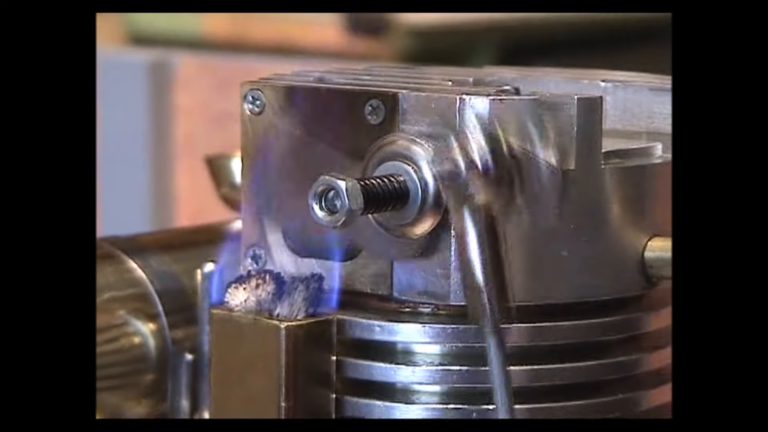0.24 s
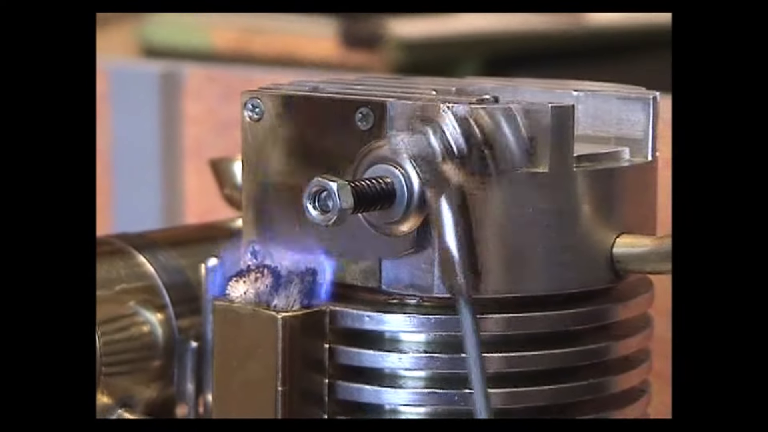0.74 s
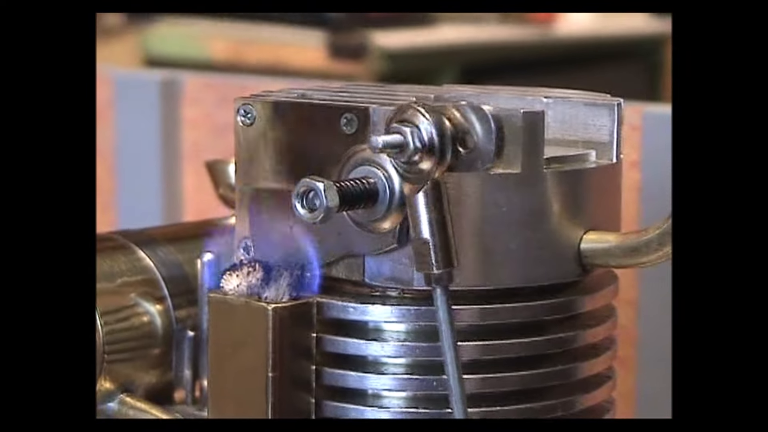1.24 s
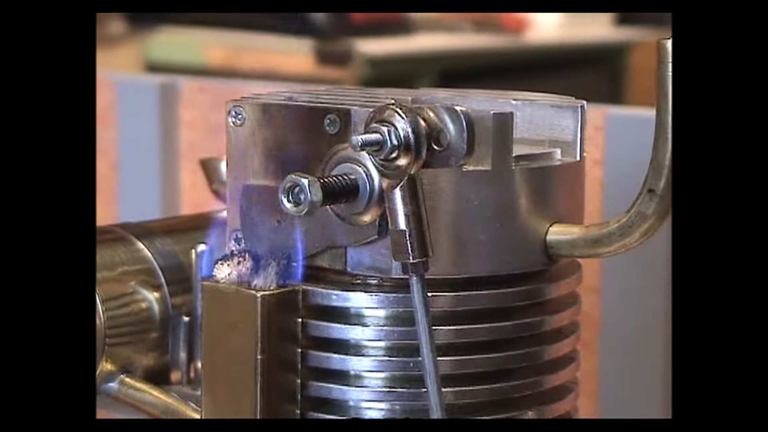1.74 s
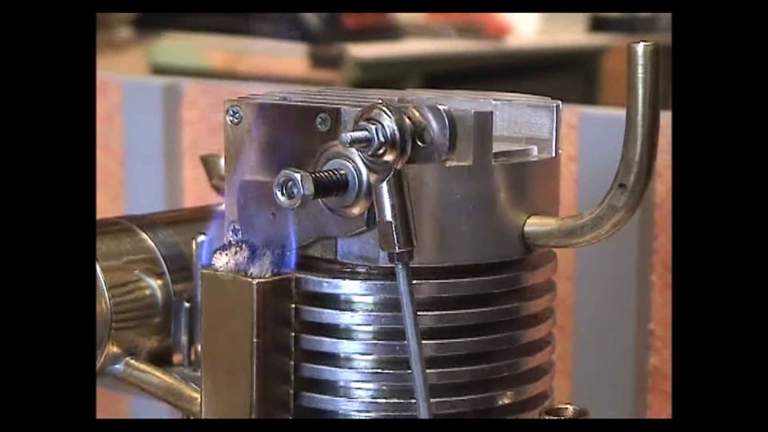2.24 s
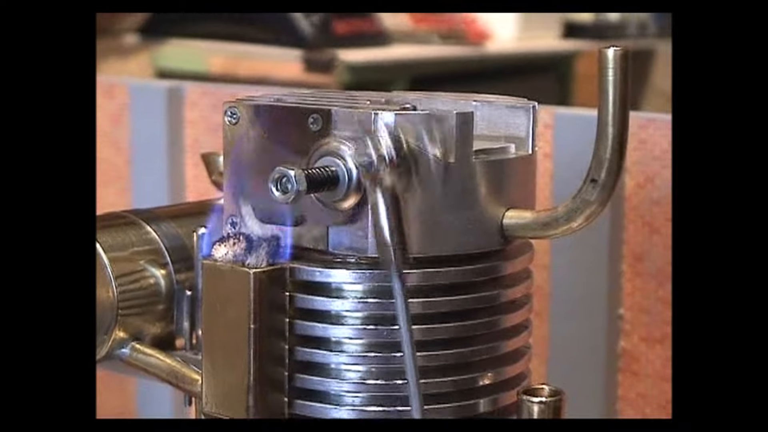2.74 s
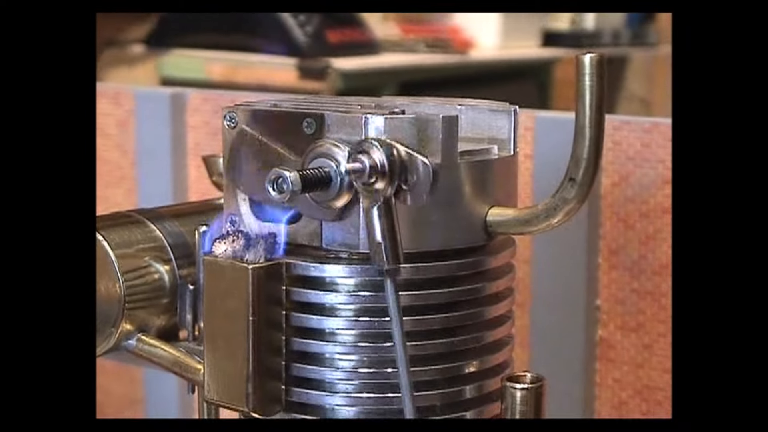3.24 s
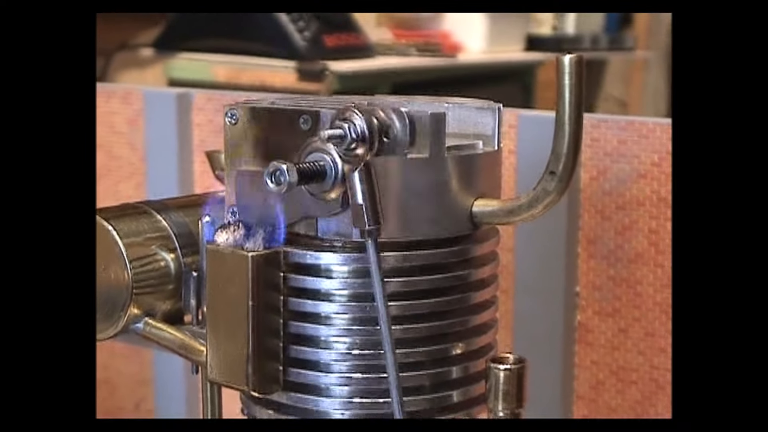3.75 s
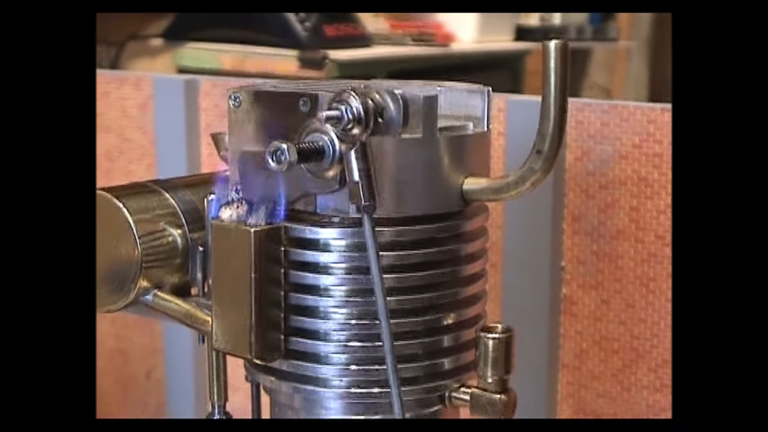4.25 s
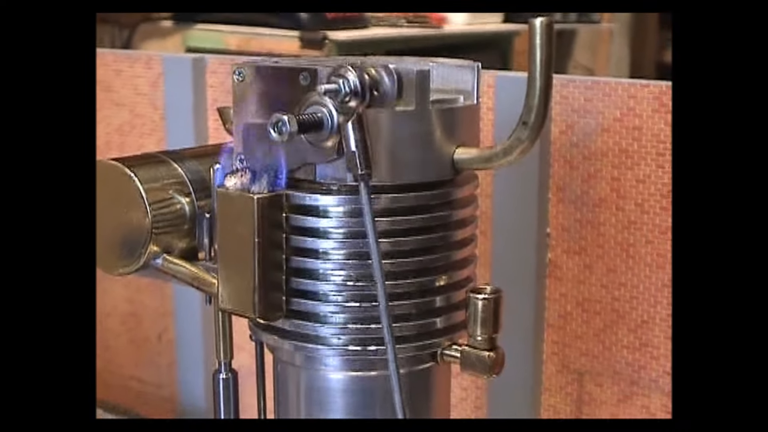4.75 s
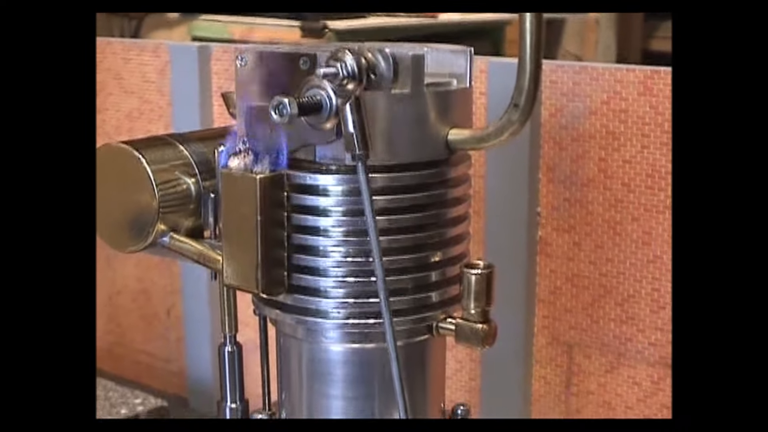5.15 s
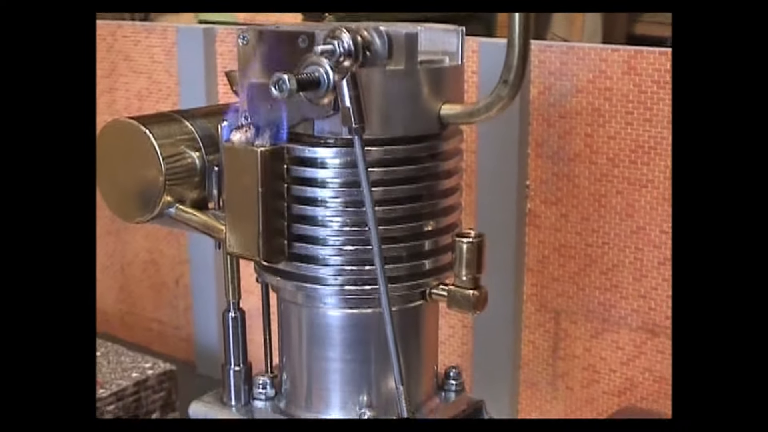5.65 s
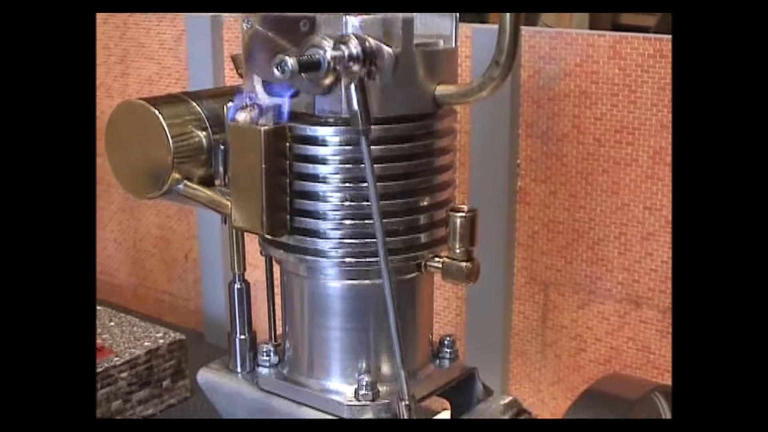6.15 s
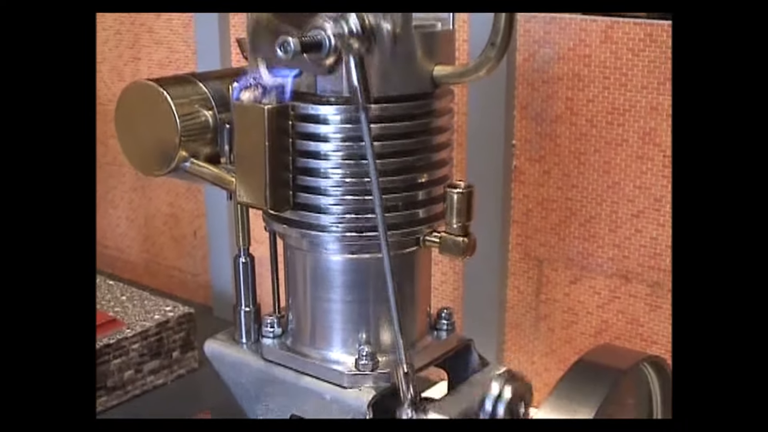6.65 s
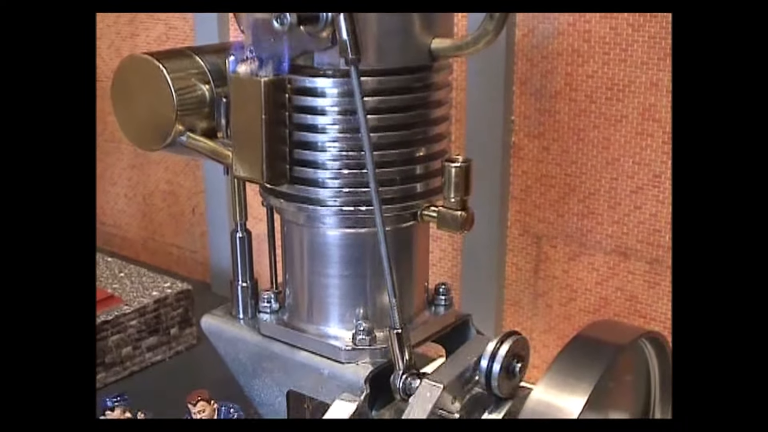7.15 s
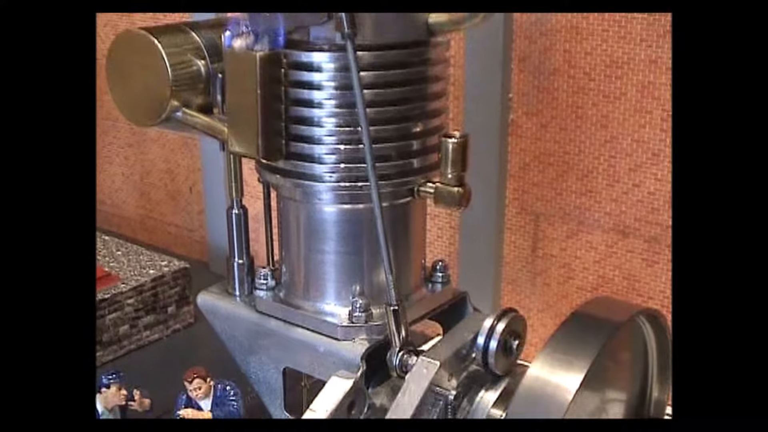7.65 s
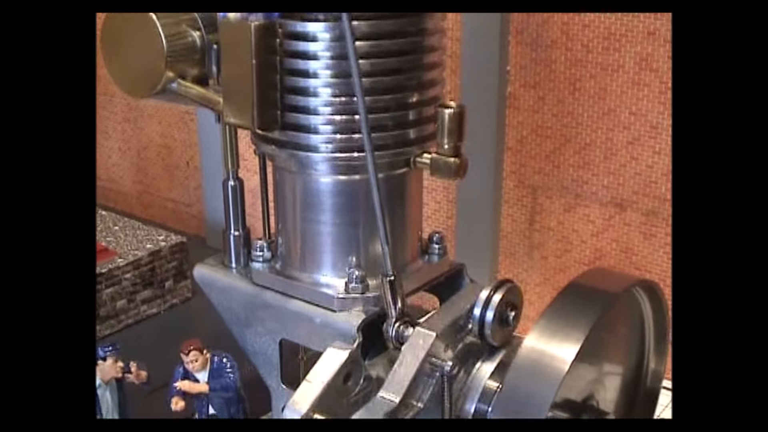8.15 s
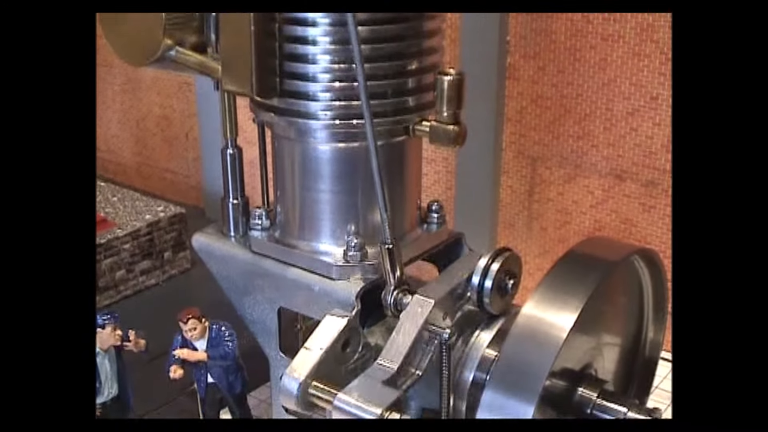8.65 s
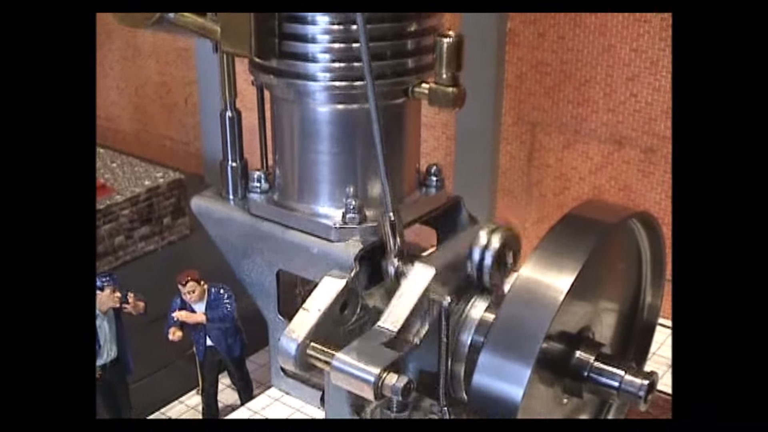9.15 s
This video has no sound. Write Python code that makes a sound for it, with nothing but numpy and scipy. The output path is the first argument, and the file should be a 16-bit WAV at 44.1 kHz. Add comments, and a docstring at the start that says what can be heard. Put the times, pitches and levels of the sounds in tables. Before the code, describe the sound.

Close stereo pickup of a little flame-driven engine, already running and never stopping. Crisp snaps and lower frame knocks alternate evenly, roughly nine main beats a second, with small ticks and rattling between them. Friction swishes with every turn and the cylinder air hums faintly in the middle range. Soft steady room noise and a short, light indoor echo surround it, with little deep bass.

```python
"""A small flame-fed model engine runs at about four and a half turns a second on a bench in a quiet workshop.
Soft room noise and the rubbing of sliding parts sound throughout; the cylinder air hums under them.
Once a turn faint ticks lead to the valve snap, with its puff and rebound; half a turn later the crank knocks
the frame, the valve gear ticks, the cylinder hoots and the gear rattles. From 1.88 s a loose part taps at times.
Contacts are noise bursts and decaying modes, rubbing is noise through those modes; the shop echoes it all."""
import sys
import numpy as np
from scipy import signal
from scipy.fft import rfft, irfft, next_fast_len
from scipy.io import wavfile

SR = 44100
rng = np.random.default_rng(int(sys.argv[2]) if len(sys.argv) > 2 else 0)


def convert_level_to_amplitude(level_db):
    """Map a level in decibels to its linear amplitude factor."""
    exponent = np.asarray(level_db, float) / 20
    return 10 ** exponent


def master_out(mix):
    """Clip the mix to full scale and print it as 16-bit PCM to the path in sys.argv[1]."""
    frames = np.transpose(np.atleast_2d(mix))
    ceiling = np.clip(frames, -1, 1)
    pcm = np.round(ceiling * 32767).astype(np.int16)
    wavfile.write(sys.argv[1], SR, pcm)


N = 414981


def rms_one(x):
    """Scale to rms 1."""
    return x / np.sqrt(np.mean(x ** 2) + 1e-20)


def at_hz(points, hz):
    """Interpolate (hz, value) points on a log-frequency axis."""
    points_hz, values = np.transpose(points)
    return np.interp(np.log(hz), np.log(points_hz), values)


def drift(rate_hz):
    """Slow random wander of rms 1: noise through two equal poles at rate_hz, computed every 40 samples."""
    hop = 40
    r = np.exp(-2 * np.pi * rate_hz * hop / SR)
    slow = signal.lfilter([1], [1, -2 * r, r * r], rng.standard_normal(N // hop + 2002))[2000:]
    return np.interp(np.arange(N) / hop, np.arange(len(slow)), rms_one(slow))


# stereo lean of radiated modes: pitch_hz, left_minus_right_db
LEAN = [(250, 1.27), (800, -1.71), (1180, 5.5), (2000, -1)]


def ring(push, hz, t60_s):
    """Two-pole resonator: a unit click rings a decaying sine of height 1, leaning to one side by pitch."""
    r, w = convert_level_to_amplitude(-60 / (t60_s * SR)), 2 * np.pi * hz / SR
    lean_db = at_hz(LEAN, hz)
    tone = signal.lfilter([0, np.sin(w)], [1, -2 * r * np.cos(w), r * r], push + 1e-18)
    return tone * convert_level_to_amplitude(np.array([[lean_db / 2], [-lean_db / 2]]))


def ring_modes(push, modes):
    """One push rings every (pitch_hz, level_db, t60_s) mode."""
    return sum(convert_level_to_amplitude(db) * ring(push, hz, t60_s) for hz, db, t60_s in modes)


def train(start_s, sizes):
    """Clicks of the given sizes at the given times."""
    out = np.zeros(N)
    at = np.clip(np.asarray(start_s) * SR, 0, N - 1).astype(int)
    np.add.at(out, at.ravel(), np.ravel(sizes))
    return out


def soften(clicks, hz):
    """A soft contact spreads the push in time: two equal low-pass poles."""
    r = np.exp(-2 * np.pi * hz / SR)
    return signal.lfilter([(1 - r) ** 2], [1, -2 * r, r * r], clicks + 1e-18)


def chatter(start_s, level_db, spread_s, count):
    """A loose contact lands as uneven touches, up to 8 dB down; returns times and levels."""
    draw = rng.random((len(start_s), count, 2))
    return start_s[:, None] + spread_s * draw[..., 0], level_db[:, None] - 8 * draw[..., 1]


def strike(modes, start_s, level_db, uneven_db, detune, wide):
    """Each touch rings each mode with its own strength, sign and detuning, a little unlike at the two ears."""
    out, t = np.zeros((2, N + 4000)), np.arange(2000) / SR
    starts = np.clip(np.ravel(start_s) * SR, 0, N).astype(int)
    chance = rng.standard_normal((len(starts), 4, len(modes), 1))
    hz, mode_db, t60_s = np.transpose(modes)[:3, :, None]
    for start, blow_db, (size, sign, tune, lead) in zip(starts, np.ravel(level_db), chance):
        fading_db = blow_db + mode_db + uneven_db * size - 60 * t / t60_s
        fading = np.sign(sign) * convert_level_to_amplitude(fading_db) * np.minimum(t / 0.0001, 1)
        phase = 2 * np.pi * hz * (1 + detune * tune) * t
        skew = wide * lead * hz / 8000      # higher modes radiate less alike to both sides
        ears = [np.sum(fading * np.sin(phase + side * skew), axis=0) for side in (1, -1)]
        out[:, start:start + len(t)] += ears
    return out[:, :N]


def crack(start_s, level_db):
    """Bare noise of metal meeting metal: a short band-limited burst at each hard contact."""
    r = np.exp(-1 / (0.0014 * SR))      # rise and decay time constant 1.4 ms
    clicks = train(start_s, convert_level_to_amplitude(level_db)) + 1e-18
    burst = signal.lfilter([1 - r], [1, -r], signal.lfilter([1], [1, -r], clicks))
    noise = rng.standard_normal(N) + 0.62 * rng.standard_normal((2, N))
    bright = signal.sosfilt(signal.butter(1, 2450, "high", fs=SR, output="sos"), burst * noise)
    return signal.sosfilt(signal.butter(3, 9230, fs=SR, output="sos"), bright)


# workshop noise spectrum, relative: pitch_hz, density_db_per_hz
ROOM = [(30, -67), (130, 13), (340, 7.5), (800, 7), (1500, 2), (2480, -3), (6050, -7), (9970, -20),
        (16000, -36)]
# left-right likeness of the noise: pitch_hz, correlation_ratio
LIKENESS = [(140, 0.89), (380, 0.883), (2380, 0.68), (15000, 0.79)]


def room_noise(patchy_db):
    """Half-octave bands of stereo noise, each with its own level, flicker and left-right likeness."""
    out, edges_hz = 0, 30 * 2 ** np.arange(0, 9.6, .5)
    white = rng.standard_normal((2, 2, N))
    for k, (low, high) in enumerate(zip(edges_hz, edges_hz[1:])):
        band = signal.butter(2, [low, high], "band", fs=SR, output="sos")
        mid, side = signal.sosfilt(band, white[k % 2])
        hz = np.sqrt(low * high)
        alike = np.clip(at_hz(LIKENESS, hz), -1, 1)
        gain = convert_level_to_amplitude(at_hz(ROOM, hz) + patchy_db * drift(8.2))
        out = out + gain * (np.sqrt(1 + alike) * mid + np.sqrt(1 - alike) * side * [[1], [-1]])
    return convert_level_to_amplitude(-49) * rms_one(out)


# crank knocks, nominal: start_s, clank_db, thud_db
KNOCKS = [(0.144, -19.5, -21), (0.3658, -20.5, -24), (0.5845, -22.5, -27), (0.8101, -21, -26),
          (1.0412, -25.5, -22.5), (1.274, -25, -23), (1.5078, -23.5, -21), (1.7392, -24, -22.5),
          (1.9738, -22.5, -24.5), (2.2018, -22, -21), (2.428, -29, -24.5), (2.6596, -22.5, -24),
          (2.8857, -23, -21), (3.1105, -24.5, -21.5), (3.3311, -26, -22.5), (3.5576, -21, -21.5),
          (3.7852, -26, -25.5), (4.011, -21.5, -22), (4.2422, -24.5, -23), (4.4702, -25.5, -25),
          (4.6958, -22.5, -22), (4.9202, -20, -21), (5.1406, -25.5, -23.5), (5.363, -25.5, -23),
          (5.5855, -20, -23), (5.8084, -22.5, -23.5), (6.0321, -22.5, -25), (6.26, -24, -23),
          (6.4845, -28.5, -24), (6.7137, -23, -22), (6.9412, -22, -23), (7.1652, -21.5, -24.5),
          (7.4, -21.5, -23.5), (7.6324, -32.5, -24), (7.8777, -27, -21.5), (8.1212, -24, -25),
          (8.3616, -23, -22.5), (8.598, -22.5, -22), (8.833, -22, -21), (9.0635, -23.5, -21),
          (9.2904, -26.5, -22)]
# rubbing through one turn from the knock, relative: turn_ratio, level_db
RUB = [(0, -43.5), (.1, -35), (.25, -40), (.36, -47), (.42, -39.5), (.6, -49), (.75, -78), (1, -38)]


def rub_strength():
    """Rubbing strength follows the crank angle, with a random flicker."""
    s = np.transpose(KNOCKS)[0]
    knots_s = np.r_[2 * s[0] - s[1], s, 2 * s[-1] - s[-2]]
    turn = np.interp(np.arange(N) / SR, knots_s, np.arange(len(knots_s))) % 1
    return convert_level_to_amplitude(np.interp(turn, *np.transpose(RUB)) + 2.5 * drift(25))


# frame and bench modes: pitch_hz, level_db, t60_s
FRAME = [(249.3, -6, 0.058), (289, -17, 0.16), (341.7, -8.5, 0.079), (440.06, -11.5, 0.082),
         (475.7, -21.5, 0.3), (519, -21, 0.31), (1006.3, -11, 0.062), (1167.7, -4, 0.03),
         (1243, -21, 0.086), (1463, 1.5, 0.016), (1981, -12, 0.03), (2350, -20.5, 0.1), (2975, -10, 0.018),
         (3448, -9.5, 0.018), (4266, -13.5, 0.034), (5190, -22, 0.05), (7100, -15, 0.042),
         (10210, -16, 0.011), (12330, -38, 0.015)]
# thin casing modes: pitch_hz, level_db, t60_s
CASING = [(1500, -88, 0.096), (2048, -88, 0.04)]
# valve plate and lever modes: pitch_hz, level_db, t60_s
VALVE = [(3200, -13, 0.0048), (4760, -9, 0.01694), (5373, -10.5, 0.014), (6134, -2.5, 0.0095),
         (7495, -12, 0.015), (8980, -16, 0.024), (11700, -18, 0.0065), (13800, -28, 0.0067)]


def sliding_parts(stroke):
    """Friction noise drives frame and valve modes with the stroke; the casing sings faintly on its own drift."""
    rub = rng.standard_normal(N)
    frame = convert_level_to_amplitude(-28.5) * ring_modes(rub * stroke, FRAME[:14])
    valve = convert_level_to_amplitude(-37.5) * ring_modes(rub * stroke, VALVE)
    casing = ring_modes(rub * convert_level_to_amplitude(5.1 * drift(9.8)), CASING)
    return frame + valve + casing


# close, beating cylinder air modes: pitch_hz, level_db, t60_s
AIR = [(629.6, -1, 0.099), (684, 1.5, 0.07), (726, -1.5, 0.045)]


def cylinder_air(stroke):
    """Ticks kick neighbouring air modes in opposite sense, so they swell together; flame and rub keep a hum."""
    s = np.transpose(KNOCKS)[0]
    hoot_db = -27.5 + 0.5 * rng.standard_exponential(len(s))
    late = rng.standard_normal((len(s), 2))
    kick = train(s + .0262, convert_level_to_amplitude(hoot_db))
    kick += train(s + 0.042 + 0.00279 * late[:, 0], convert_level_to_amplitude(-34.5 + 6.3 * late[:, 1]))   # the rattle's second kick
    draught = convert_level_to_amplitude(-32.5) * stroke + convert_level_to_amplitude(-73.5)
    out = 0
    for k, (hz, db, t60_s) in enumerate(AIR):
        flame = rng.standard_normal(N)
        out = out + convert_level_to_amplitude(db) * ring((-1) ** k * kick + draught * flame, hz, t60_s)
    return out


# valve closings, nominal: start_s, level_db
SNAPS = [(0.0367, -9), (0.2546, -9.5), (0.4759, -13), (0.6991, -13.5), (0.926, -10), (1.1569, -10),
         (1.39, -10), (1.6218, -13), (1.8535, -9.5), (2.0865, -12.5), (2.3149, -12), (2.542, -10.5),
         (2.772, -10.5), (2.998, -9.5), (3.2206, -11), (3.4464, -14), (3.6708, -10.5), (3.8973, -11),
         (4.1254, -9.5), (4.355, -11), (4.5813, -10.5), (4.8074, -11.5), (5.0305, -10), (5.2513, -11.5),
         (5.4746, -12.5), (5.697, -12.5), (5.92, -11.5), (6.145, -10), (6.372, -16), (6.599, -10.5),
         (6.827, -10), (7.056, -15), (7.2821, -11), (7.517, -12.5), (7.7536, -10), (7.9967, -10),
         (8.2385, -8), (8.4777, -12.5), (8.7133, -13.5), (8.9475, -11.5), (9.177, -11), (9.4037, -11.5)]
# faint ticks before each snap: ahead_s, level_db
LEAD_IN = [(.031, -43), (.019, -41)]
# closings at which the plate lands flat, nominal: start_s, level_db
FLAT_LANDINGS = [(0.037, -16), (3.2224, -17), (3.898, -24), (6.373, -24), (7.057, -21.5), (7.516, -21),
                 (8.479, -23)]


def valve_closing():
    """Lead-in ticks, scuff, snap and rebound ring the valve; seating rings the frame, and the air puffs."""
    shut, snap_db = np.transpose(SNAPS)
    puff_db, rebound_db = np.transpose([-25, -33.5] + [1.1, 4.] * rng.standard_normal((len(shut), 2)))
    ahead_s, lead_db = np.transpose(LEAD_IN)
    slack = rng.standard_normal((len(shut), len(LEAD_IN), 2))
    lead_in = shut[:, None] - ahead_s + 0.00037 * slack[..., 0], lead_db + 4 * slack[..., 1]
    scuff = chatter(shut - .003, snap_db - 19, .005, count=4)
    snap = shut - .0007, snap_db - 7.0
    rebound = chatter(shut + .012, rebound_db, .002, count=1)
    touches = [lead_in, scuff, snap, rebound]
    out = sum(strike(VALVE, *touch, uneven_db=1, detune=0.052, wide=0.37) for touch in touches)
    out += crack(shut - .0012, snap_db - 13.5)
    seating = chatter(shut - .005, puff_db - 12.5, 0.0052, count=3)
    out += strike(FRAME[6:13], *seating, uneven_db=4, detune=.12, wide=.9)
    # the cut-off air stream springs back once
    puff = soften(train(shut - .0042, -convert_level_to_amplitude(puff_db + 3.5)), hz=1233)
    # the plate knocks its seat
    seat_db = puff_db - 8.5 + 3 * rng.standard_normal(len(shut))
    seat = soften(train(shut - .0015, convert_level_to_amplitude(seat_db)), hz=1460)
    landing_s, landing_db = np.transpose(FLAT_LANDINGS)
    landing = soften(train(landing_s + 0.00203, convert_level_to_amplitude(landing_db)), hz=616)
    return out + ring(puff, 197.0, 0.012) + ring(seat, 980, 0.027) + ring(landing, 846, 0.043)


def crank_knock():
    """Hard touches crack and ring high frame modes, a shiver the middle ones, a soft blow the low ones."""
    s, clank_db, thud_db = np.transpose(KNOCKS)
    low = [m for m in FRAME if m[0] < 700]
    middle = [m for m in FRAME if 700 < m[0] < 1600]
    high = [m for m in FRAME if m[0] > 1600]
    spread_db = 1.73      # how unlike the blows ring low and middle modes
    thud = clank = 0
    for hz, db, t60_s in low:
        own_db = spread_db * rng.standard_normal(len(s))
        blow = soften(train(s + 0.0019, convert_level_to_amplitude(thud_db + 7.0 + db + own_db)), hz=900)
        thud = thud + ring(blow, hz, t60_s)
    # a small frame radiates no deep bass
    thud = signal.sosfilt(signal.butter(3, 125, "high", fs=SR, output="sos"), thud)
    for hz, db, t60_s in middle:      # the bearing cap passes the blow on as a short shiver
        own_db = spread_db * rng.standard_normal(len(s))
        blow = train(s + 0.00106, -convert_level_to_amplitude(clank_db - 28.5 + db + own_db))
        shiver = ring(blow, hz=1239, t60_s=0.014)[0]
        clank = clank + ring(shiver, hz, t60_s)
    touch_s, touch_db = chatter(s + 0.00045, np.full(len(s), -25), 0.0061, count=5)
    hard = strike(high, touch_s, touch_db, uneven_db=1.5, detune=0.0334, wide=0.3)
    return thud + clank + hard + crack(touch_s, touch_db - 6)


def valve_tick():
    """After the knock the valve gear touches twice, ringing the valve modes with a crack."""
    s = np.transpose(KNOCKS)[0]
    tick_db = -27.5 + 3 * rng.standard_exponential(len(s))
    touch_s, touch_db = chatter(s + .0228, tick_db, 0.0021, count=2)
    ticks = strike(VALVE, touch_s, touch_db, uneven_db=1, detune=0.052, wide=0.37)
    return ticks + crack(touch_s, touch_db - 12)


def valve_rattle():
    """Loose gear touches ring frame modes, reaching higher ones later, up to the fifth."""
    s = np.transpose(KNOCKS)[0]
    rattle_db = -36.64 + 2.5 * rng.standard_normal(len(s))
    touch_s, touch_db = chatter(s + .04, rattle_db, .006, count=7)
    out = 0
    for k, mode in enumerate(FRAME[7:16]):
        climb_s = min(k, 4) * .0022
        out = out + strike([mode], touch_s + climb_s, touch_db, uneven_db=3, detune=.03, wide=.9)
    return out


# wooden-sounding taps, nominal: start_s, level_db, pitch_ratio
TAPS = [(1.88, -9, 1.006), (2.182, -24.5, 2.1), (3.251, -27, 1.01), (5.8039, -20, 0.9), (8.172, -16, 1.39)]
# loose part modes at pitch_ratio 1: pitch_hz, level_db, t60_s
LOOSE = [(700, -17, .04), (1490, -17, .1), (1600, -2, .016), (1776, -15, .07), (1970, -8, .018),
         (2350, -12, .03), (4420, -16, .015), (5000, -19, .01)]


def loose_part():
    """A loose part taps in double touches, higher or lower; a higher tap dies sooner."""
    out = 0
    for s, db, pitch in TAPS:
        modes = np.multiply(LOOSE, [pitch, 1, 1 / pitch])
        out = out + strike(modes, [s - 0.0004, s + 0.0005], [db - 12, db - 2.5],
                           uneven_db=1.5, detune=0.021, wide=0.71)
    return out


def workshop(x):
    """Eight dulling feedback delays a side, evaluated over frequency; the light walls return little bass."""
    t60_s, wall_cut_hz = .2, 14000
    size = next_fast_len(N + SR)
    hz = np.arange(size // 2 + 1) * SR / size
    spectrum = rfft(x, size) * hz ** 2 / (hz ** 2 + 380 ** 2)
    dull = 1 / (1 + 1j * hz / wall_cut_hz)
    out = np.zeros((2, len(hz)), complex)
    for k, lag_s in enumerate(rng.uniform(0.0034, .03, 16)):
        loop = convert_level_to_amplitude(-60 * lag_s / t60_s) * dull * np.exp(-2j * np.pi * hz * lag_s)
        out[k % 2] += (-1) ** (k // 2) * loop / (1 - loop)
    return irfft(out * spectrum, size)[:, :N]


def scene():
    """The engine, its echo in the shop and the room noise."""
    room = room_noise(patchy_db=.7)
    stroke = rub_strength()
    engine = sliding_parts(stroke) + cylinder_air(stroke) + valve_closing()
    engine = engine + crank_knock() + valve_tick() + valve_rattle() + loose_part()
    return engine + convert_level_to_amplitude(-20.5) * workshop(engine.mean(axis=0)) + room


def band_limit(x):
    """A steep low-pass at the top of the band."""
    return signal.sosfilt(signal.butter(12, 16480, fs=SR, output="sos"), x)


def record(dry):
    """The deep bass is thinned by a high-pass; the top is band-limited by a steep low-pass."""
    thin = signal.sosfilt(signal.butter(3, 72, "high", fs=SR, output="sos"), dry)
    mix = signal.sosfilt(signal.cheby2(12, 60, 16800, fs=SR, output="sos"), thin)
    return band_limit(mix)


dry = scene()
out = record(dry)
master_out(out)
```